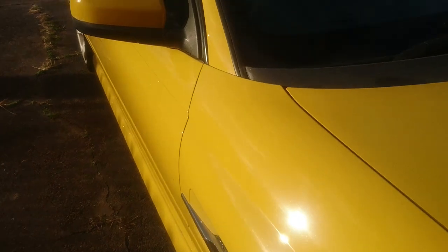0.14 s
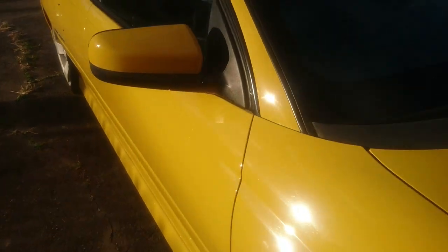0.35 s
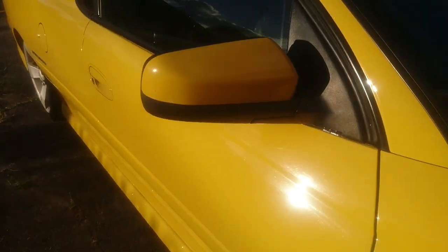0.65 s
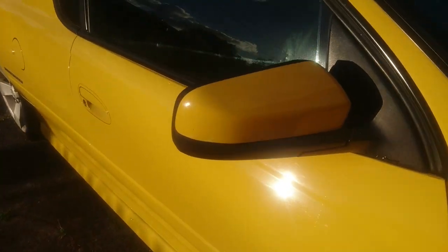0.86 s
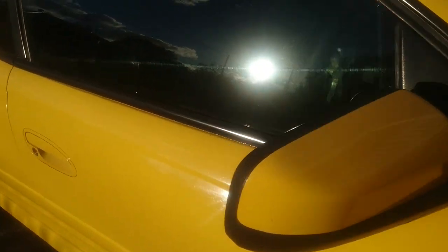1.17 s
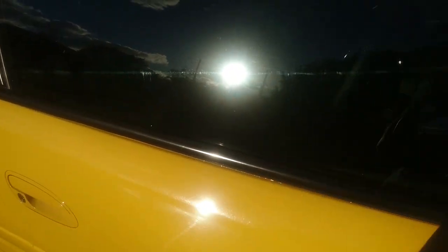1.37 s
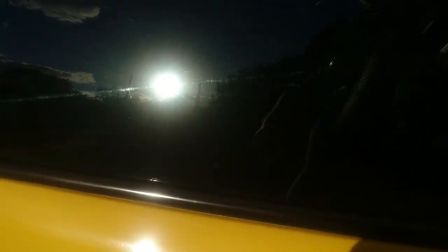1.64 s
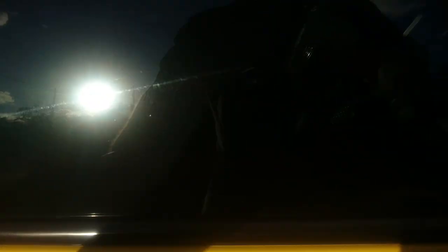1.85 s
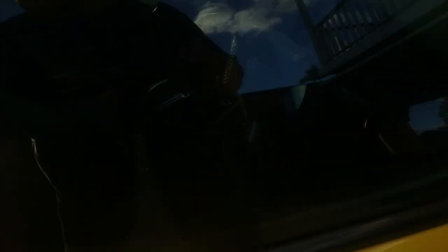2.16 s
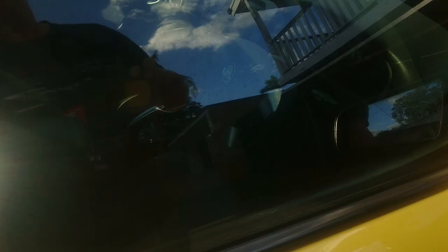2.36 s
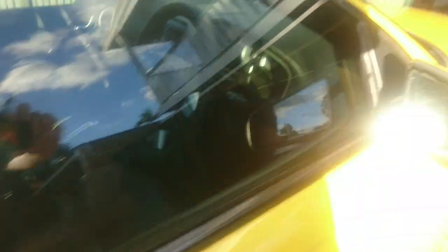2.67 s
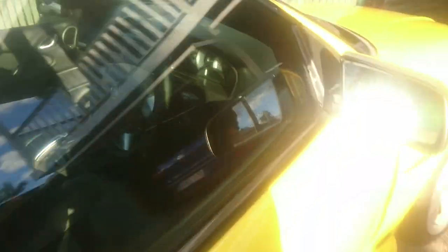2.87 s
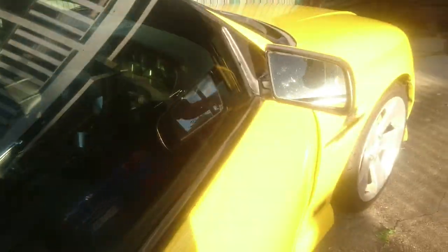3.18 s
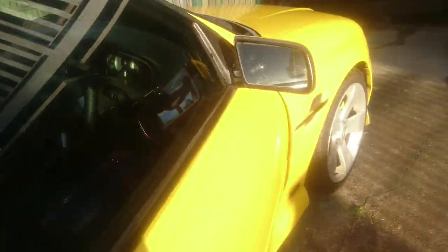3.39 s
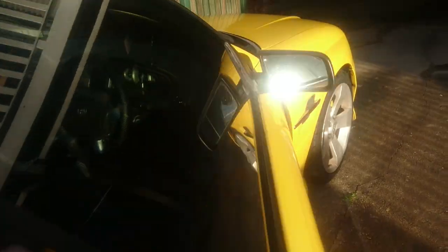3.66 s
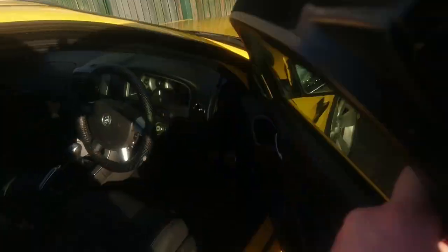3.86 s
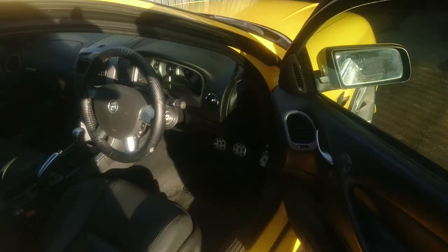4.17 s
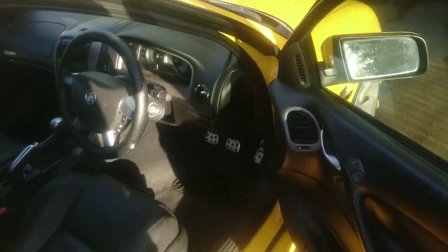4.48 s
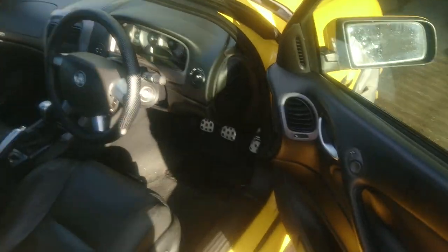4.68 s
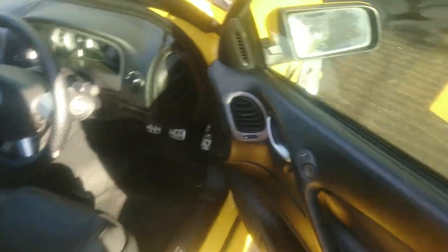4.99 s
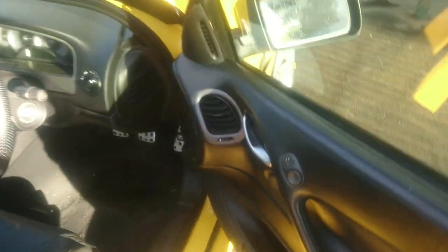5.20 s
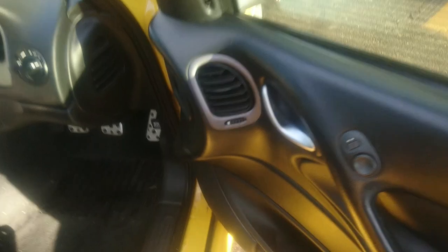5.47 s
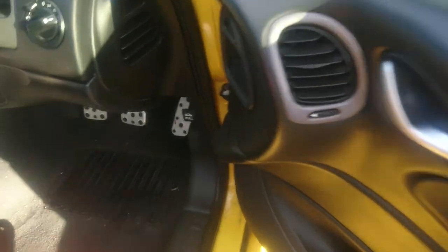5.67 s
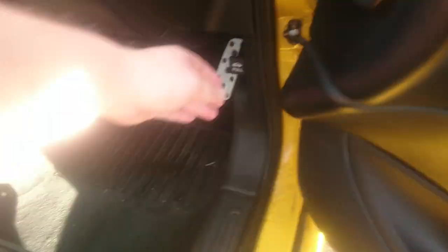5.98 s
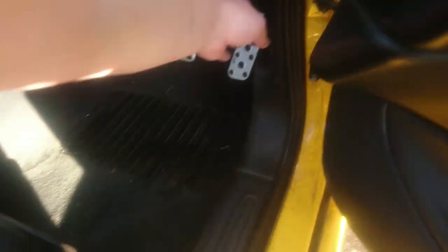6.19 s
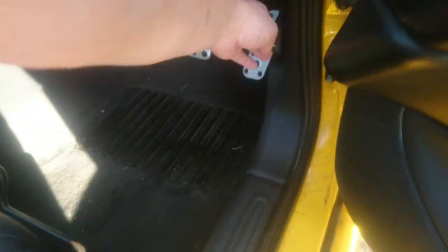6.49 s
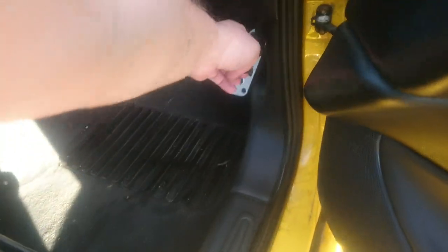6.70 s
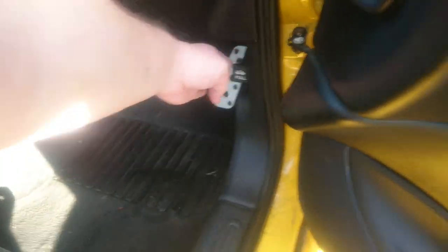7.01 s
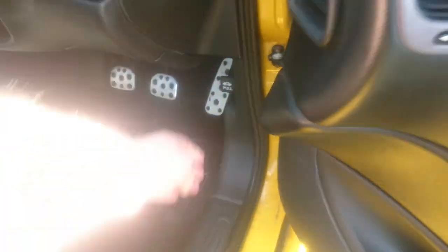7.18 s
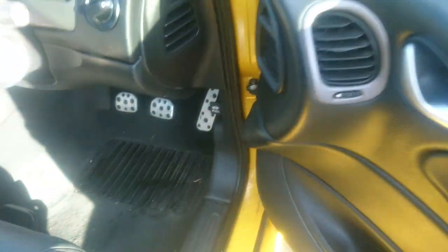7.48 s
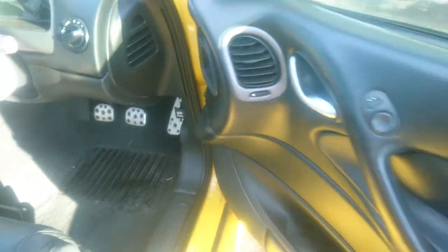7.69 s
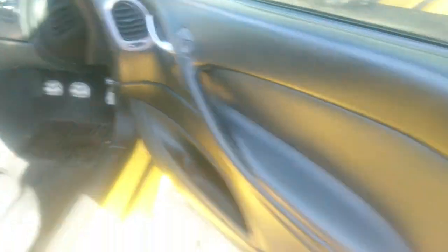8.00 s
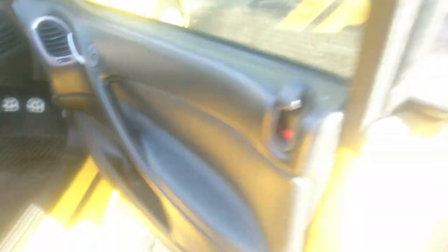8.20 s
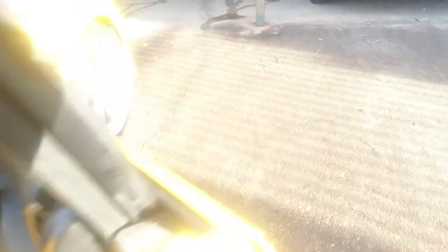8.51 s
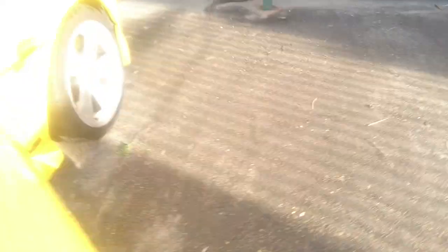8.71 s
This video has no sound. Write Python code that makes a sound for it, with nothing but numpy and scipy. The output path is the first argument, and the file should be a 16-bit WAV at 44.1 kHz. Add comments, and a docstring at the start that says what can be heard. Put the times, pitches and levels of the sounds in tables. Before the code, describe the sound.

Handle knocks and latch clicks open a car door in a quiet driveway; later a pressed pedal snaps back, booming in the footwell.

```python
"""In a quiet driveway, a car door is opened: the handle knocks on the metal panel, the latch clicks
free, and the door swings out with a soft rub. Then a hand pushes the accelerator pedal to the floor
and lets it spring back; it clacks on its stops and the footwell booms. Close by, sleeves rustle,
small things tick and feet shift, over a faint low rumble and one chirp from a far bird."""
import sys
import numpy as np
from scipy import signal
from scipy.fft import rfft, irfft, next_fast_len
from scipy.io import wavfile

SR = 44100
rng = np.random.default_rng(int(sys.argv[2]) if len(sys.argv) > 2 else 0)


def waveform_to_disk(signal):
    """Save audio, clipped to [-1, 1], as 16-bit WAV at the path in sys.argv[1]."""
    frames = np.transpose(np.atleast_2d(signal))
    scaled = np.clip(frames, -1, 1) * 32767
    samples = np.round(scaled).astype(np.int16)
    wavfile.write(sys.argv[1], SR, samples)


N = 390285
T = np.arange(N) / SR


def amp(db):
    """Turns decibels into a number to multiply by."""
    return 10 ** (np.asarray(db) / 20)


def unit(x):
    """Scales a signal to an average strength (rms) of 1."""
    return x / np.sqrt(np.mean(x ** 2) + 1e-20)


def read(points, hz):
    """Looks up a table at any frequency, blending between its rows."""
    f, value = np.transpose(points)
    return np.interp(np.log(hz + 1), np.log(f + 1), value)


def add(mix, s, sound):
    """Adds a sound to the mix, s seconds in."""
    part = mix[:, round(s * SR):][:, :sound.shape[-1]]
    part += sound[..., :part.shape[1]]


def fade(t, fade_s):
    """Dies away by 60 dB in the fade time, fade_s."""
    return np.exp(-np.log(1000) * t / fade_s)


def arch(length_s):
    """Swells from nothing and sinks back."""
    return np.sin(np.pi * np.arange(0, length_s, 1 / SR) / length_s).clip(0)


def wobble(per_s):
    """Drifts to a new random value per_s times a second."""
    targets = rng.standard_normal(N // 20)
    return unit(np.interp(T * per_s, np.arange(len(targets)), targets))


# how alike left and right sound: (frequency [Hz], likeness [0 to 1])
LIKENESS = [(50, 0.94), (200, 0.98), (500, 0.91), (1000, 0.38), (2200, 0.28), (6000, 0.11)]
def noise(count, colour):
    """Stereo noise, alike on both sides in the bass; colour(hz) gives each frequency's level in dB."""
    size = next_fast_len(count)
    hz = np.fft.rfftfreq(size, 1 / SR)
    left, other = rfft(rng.standard_normal((2, size)))
    same = read(LIKENESS, hz)
    right = same * left + np.sqrt(1 - same ** 2) * other
    return unit(irfft(np.array([left, right]) * amp(colour(hz)), size)[:, :count])


# the tone of the open air: (frequency [Hz], level [dB])
AIR_TONE = [(12, -43), (26, -32), (40, -10.5), (65, -0.5), (172, -12.5), (410, -17.5), (558, -28.5),
            (1330, -36), (2460, -40.5), (5080, -40), (5850, -34), (7950, -43.5), (16000, -46.5)]
def outdoors():
    """A faint steady hiss over a low rumble that swells a little."""
    air = amp(-50.53) * noise(N, lambda hz: read(AIR_TONE, hz))
    rumble = signal.sosfiltfilt(signal.butter(2, 400, fs=SR, output="sos"), air)  # below 400 Hz
    hiss = air - rumble
    return hiss + rumble * amp(-1.3 + 0.85 * wobble(per_s=4.1))


def slips(grain_db, clump_db):
    """Rubbing things move in clumps of tiny slips, so their loudness flickers."""
    return unit(amp(grain_db * wobble(per_s=590) + clump_db * wobble(per_s=32)))


# the tone of rubbing cloth: (frequency [Hz], level [dB])
CLOTH_TONE = [(300, 5.5), (900, 1), (1800, 0), (2700, -4), (4200, -2), (6500, 1.5), (8000, -13.5),
              (15000, -16)]
# movements of sleeve and hand: (start [s], length [s], level [dB])
SLEEVE_MOVES = [(0, 0.21, -62.5), (0.569, 0.23, -64.5), (1.116, 0.3, -59.5), (1.838, 0.31, -57),
                (2.101, 0.31, -63.5), (2.492, 0.54, -61.5), (4.947, 0.3, -60.5), (5.182, 0.41, -64),
                (5.77, 0.57, -61.5), (7.417, 0.59, -59.5), (7.975, .12, -56.5), (8.543, 0.38, -58.5)]
def sleeve_rustle():
    """Sliding cloth makes a grainy hiss that swells with each movement."""
    swells = np.zeros((1, N))
    for s, length_s, db in SLEEVE_MOVES:
        add(swells, s, amp(db) * arch(length_s) ** 0.7)
    return swells * slips(grain_db=3, clump_db=1.5) * noise(N, lambda hz: read(CLOTH_TONE, hz))


def taps(rows, narrowness, rise_ms, top_hz, top_db):
    """Short bursts of noise, each strongest near its own pitch and turned down above top_hz."""
    t, out = np.arange(SR // 3) / SR, np.zeros((2, N))
    for s, db, pitch_hz, fade_s in rows:
        colour = lambda hz: -narrowness * np.log2((hz + 1) / pitch_hz) ** 2 + top_db * (hz > top_hz)
        rise = 1 - np.exp(-1000 * t / rise_ms)
        add(out, s, amp(db) * noise(len(t), colour) * fade(t, fade_s) * rise)
    return out


# the clearest ticks: (time [s], level [dB], pitch [Hz])
CLEAR_TICKS = [(.1984, -51, 4000), (0.2077, -50, 3580), (.7068, -48.5, 4100), (1.8705, -53, 1700),
               (1.9931, -38, 3140), (2.006, -39, 3080), (2.0497, -48, 3880), (2.312, -46, 4900),
               (3.5125, -51, 3500), (3.8394, -50, 1980), (4.5527, -51.5, 4200), (5.4844, -50, 4000),
               (5.5651, -40.5, 2820), (6.0226, -45, 2280), (6.1225, -46, 3130), (6.251, -47.5, 4560),
               (6.293, -48, 5000), (7.2544, -42.5, 5100), (7.2704, -39.5, 2020), (7.3235, -48.5, 1740),
               (8.6336, -52, 1490), (8.7202, -43.5, 2800), (8.7387, -35, 2180)]
def small_ticks():
    """Grit, clothes and trim tick; three faint extra ticks fall at random in each sleeve movement."""
    strays = [(s + length_s * rng.random(), db + 1 + 2.5 * rng.standard_normal(), 3520)
              for s, length_s, db in SLEEVE_MOVES for _ in range(3)]
    fade_s = 0.039
    rows = [(*tick, fade_s) for tick in CLEAR_TICKS + strays]
    return taps(rows, narrowness=3.5, rise_ms=0.31, top_hz=7340, top_db=-9.5)


def far_bird():
    """One faint rising whistle, with a softer one an octave above."""
    swell, out = arch(length_s=0.14), np.zeros((2, N))
    pitch_hz = 2780 + 5400 * np.arange(len(swell)) / SR
    phase = 2 * np.pi * np.cumsum(pitch_hz) / SR
    whistle = np.sin(phase) + amp(-3) * np.sin(2 * phase)
    add(out, s=1.06, sound=amp(-63) * swell * whistle)
    return out


# steps and shifts of weight: (time [s], level [dB], pitch [Hz], fade time [s])
FOOT_BUMPS = [(1.885, -45.5, 520, 0.076), (4.39, -38, 101, 0.24), (5.089, -43.5, 203, 0.22),
              (5.37, -37.5, 66, 0.32), (6.3057, -40, 256, 0.07), (6.5396, -43, 296, 0.11),
              (8.7, -60, 90, 0.18)]
def footfalls():
    """Feet land softly and make dull bumps."""
    return taps(FOOT_BUMPS, narrowness=19, rise_ms=4.8, top_hz=7400, top_db=-7)


# short slides as the door opens: (start [s], length [s], level [dB], pitch [Hz])
DOOR_RUBS = [(1.963, 0.067, -48.5, 3320), (2.803, .13, -44, 1630), (2.95, .31, -56.5, 1710),
             (3.498, 0.1, -57, 1730), (3.582, 0.23, -63.5, 1820), (3.89, 0.19, -53, 1860),
             (4.049, 0.12, -52, 1680), (4.152, 0.079, -50.5, 1440), (4.208, .2, -57, 1520)]
# the strong parts of a rub's tone: (frequency [times the pitch], boost [dB], width [octaves])
RUB_BOOSTS = [(1, 9, 0.26), (2.25, 6, 0.22)]
def door_rubs():
    """Handle, latch, seal and hinge slide, each making a grainy hiss with a hint of pitch."""
    out = np.zeros((2, N))
    rise_s, fall_s = 0.034, 0.042
    for s, length_s, db, pitch_hz in DOOR_RUBS:
        def colour(hz):
            octaves = np.log2((hz + 1) / pitch_hz)
            peaks = sum(boost * np.exp(-((octaves - np.log2(k)) / width) ** 2)
                        for k, boost, width in RUB_BOOSTS)
            return read(CLOTH_TONE, hz) - 0.6 * octaves.clip(-2) + peaks
        t = np.arange(0, length_s, 1 / SR)
        swell = np.minimum(t / rise_s, 1) * np.minimum((length_s - t) / fall_s, 1)
        add(out, s, amp(db) * swell * noise(len(t), colour))
    return out * slips(grain_db=1.5, clump_db=0.35)


def thumps(blows, notes, wash_db, wash_fade_s, wash_hz):
    """A struck panel rings with a few notes over a wash of noise; longer contact sounds duller."""
    t, out = np.arange(SR) / SR, np.zeros((2, N))
    ring = sum(amp(db) * fade(t, fade_s) * np.sin(2 * np.pi * hz * t) * (-1) ** k
               for k, (hz, db, fade_s) in enumerate(notes))
    colour = lambda hz: -20 * np.log10(1 + (hz / wash_hz) ** 2 + (wash_hz / 2 / (hz + 1)) ** 2)
    for s, db, contact_ms in blows:
        age = t[:SR // 20] * 1000 / contact_ms
        push = age * np.exp(-2 * np.pi * age)
        panel = ring + amp(wash_db) * noise(SR, colour) * fade(t, wash_fade_s)
        add(out, s, amp(db) * signal.fftconvolve(panel, push[None] / push.sum(), axes=1))
    return out


# knocks on the door: (time [s], level [dB], contact time [ms])
DOOR_KNOCKS = [(2.049, -29, 5.3), (2.085, -25.5, 10), (2.165, -29.5, 6.7), (2.205, -35, 7.6),
               (2.312, -37, 2.5), (2.405, -12.5, 7.4), (2.441, -21.5, 2.9), (2.452, -23, 1.2),
               (2.913, -12.5, 1.5), (3.306, -37, 1.9), (3.461, -42, 1.6)]
# the notes the door rings with: (pitch [Hz], level [dB], fade time [s])
DOOR_NOTES = [(62, -20, 0.5), (71.7, -12, 0.14), (106.3, -14, 0.37), (128.3, -23, 1.42), (159, 0.5, 0.12),
              (182, 0.5, 0.11), (204.5, 1.5, 0.19), (235, -15.5, 0.46), (295, -21, 0.3), (375.7, -12, 0.18),
              (455, -18, 0.1), (563, -33, .25), (651, -13, 0.19)]
def door_knocks():
    """Knocks from the handle and latch set the door panel ringing."""
    return thumps(DOOR_KNOCKS, DOOR_NOTES, wash_db=-6, wash_fade_s=0.31, wash_hz=290)


def die_away(x, fades, stretch):
    """Lets the low, middle and high parts of a sound fade at their own speeds."""
    t, hz = np.arange(x.shape[1]) / SR, np.fft.rfftfreq(x.shape[1], 1 / SR)
    centres, times = np.transpose(fades)
    spectrum = rfft(x)
    bands = [irfft(spectrum * read(np.c_[centres, one], hz), len(t)) for one in np.eye(len(centres))]
    return sum(band * fade(t, fade_s * stretch) for band, fade_s in zip(bands, times))


def clacks(hits, tone, fades, notes, rise_ms, tail_db, tail_fade_s):
    """Hard parts meet: a burst of noise, clear metal notes and a faint tail from the car's body."""
    t, out = np.arange(SR * 2 // 3) / SR, np.zeros((2, N))
    rise = 1 - np.exp(-1000 * t / rise_ms)
    for s, db, brightness, stretch in hits:
        tilt = lambda hz: brightness * np.log2(np.clip(hz, 400, 6000) / 2000)
        colour = lambda hz: read(tone, hz) + tilt(hz)
        burst = die_away(noise(len(t), colour), fades, stretch)
        phases = rng.uniform(0, 2 * np.pi, (len(notes), 2, 1))
        ring = 0
        for (hz, note_db, fade_s), phase in zip(notes, phases):
            strength = amp(note_db + tilt(hz) - abs(brightness))
            ring += strength * fade(t, fade_s * stretch) * np.sin(2 * np.pi * hz * t + phase)
        tail = amp(tail_db) * np.sqrt(stretch) * noise(len(t), colour) * fade(t, tail_fade_s)
        add(out, s, amp(db) * (burst + ring + tail) * rise)
    return out


# clicks in handle and latch: (time [s], level [dB], brightness [dB per octave], fade stretch [times])
LATCH_HITS = [(2.3845, -44, 10, 0.18), (2.406, -40, 9, 0.84), (2.4114, -21.5, -1, 0.55),
              (2.433, -22.5, 10, 0.27), (2.442, -34.5, -2, 1.6), (2.5885, -43.5, -1, 0.7),
              (2.822, -40, 1, 1.5), (2.846, -38.5, 1, 0.69), (2.8649, -43, 4, 0.28), (2.9103, -21, 5, 0.41),
              (2.914, -28, -0.5, 1.23)]
# the tone of a click's noise: (frequency [Hz], level [dB])
LATCH_TONE = [(210, -27), (350, -12.5), (990, -16), (1280, -11), (1480, -19), (1910, -11.5), (2240, -11),
              (2670, -17.5), (3850, -22), (4380, -18), (4820, -25.5), (5940, -13), (7920, -33.5),
              (10400, -37), (16000, -42)]
# how that noise dies away: (frequency [Hz], base fade time [s])
LATCH_FADES = [(300, 0.19), (1000, 0.18), (2200, 0.17), (6000, 0.094), (14000, 0.11)]
# the latch's metal notes: (pitch [Hz], level [dB], base fade time [s])
LATCH_NOTES = [(1160, -22, 0.083), (1710, -10, 0.11), (1953, -3, 0.068), (2450, -25, 0.062),
               (3470, -11, 0.12), (6080, -12, 0.05), (6290, -3.5, 0.054)]
def latch_clicks():
    """Small metal parts strike each other as the latch lets go."""
    return clacks(LATCH_HITS, LATCH_TONE, LATCH_FADES, LATCH_NOTES,
                  rise_ms=0.51, tail_db=-33.5, tail_fade_s=1)


# the pedal hits its stops, plus one soft long brush just before the hardest clack: (time [s], level [dB],
# brightness [dB per octave], fade stretch [times])
PEDAL_HITS = [(6.7291, -27, 4, 1.03), (6.736, -31, -4, 3.13), (6.8643, -33.5, -4.5, 2.44),
              (7.0085, -45.5, -3.5, 5.4), (7.0479, -10.5, 0, 0.65), (7.052, -13, -1.5, 0.97)]
# the tone of a clack's noise: (frequency [Hz], level [dB])
PEDAL_TONE = [(180, -24), (300, -5.5), (433, -11), (645, -5.5), (774, -16.5), (828, -8), (1150, -1.5),
              (1300, -12.5), (1410, -8.5), (2140, -11), (2250, -19), (2930, -10.5), (5080, -14),
              (6620, -13), (8100, -29.5), (16000, -34.5)]
# how that noise dies away: (frequency [Hz], base fade time [s])
PEDAL_FADES = [(300, 0.17), (1000, 0.088), (2200, 0.12), (6000, 0.091), (14000, 0.1)]
# the pedal's metal notes: (pitch [Hz], level [dB], base fade time [s])
PEDAL_NOTES = [(1142, -7.5, 0.04), (1380, -13.5, 0.14), (1786, -13.5, 0.043), (1960, -13, 0.083),
               (2400, -15.5, 0.086), (2848, -12.5, 0.084), (3220, -13, 0.069), (4200, -19.5, 0.037),
               (6450, -15, 0.095)]
def pedal_clacks():
    """The pedal hits the floor, then springs back harder against its upper stop."""
    return clacks(PEDAL_HITS, PEDAL_TONE, PEDAL_FADES, PEDAL_NOTES,
                  rise_ms=0.8, tail_db=-32, tail_fade_s=0.43)


# knocks of the pedal and its links: (time [s], level [dB], contact time [ms])
FOOTWELL_KNOCKS = [(6.736, -15, 2.53), (6.793, -24, 2), (6.866, -30, 3.4), (7.004, -23.5, 3.5),
                   (7.049, -22.5, 2), (7.181, -25.5, 5.8), (7.375, -29.5, 6.4)]
# the notes the footwell rings with: (pitch [Hz], level [dB], fade time [s])
FOOTWELL_NOTES = [(50, -14.5, 0.51), (72.9, -7.5, .4), (85.55, -2, 0.51), (104.5, -10, .4),
                  (126.6, -11, 0.35), (159, 2.5, 0.21), (167, -7, 1), (184.2, -9, 0.89), (203, -11, .5),
                  (262, -8, 0.452), (289.6, -13, .4), (337.5, -10, 0.3), (384, -17.5, .35),
                  (414, -26.5, 0.36), (544, -14.5, 0.54)]
def footwell_boom():
    """The pedal's knocks make the panels around it boom like a drum."""
    return thumps(FOOTWELL_KNOCKS, FOOTWELL_NOTES, wash_db=-5, wash_fade_s=0.81, wash_hz=198)


def body_shudder():
    """The same knocks shake the whole car with a deep noise; long, strong pushes shake it most."""
    t, power = np.arange(SR) / SR, np.zeros((1, N))
    rise_s, pitch_hz = 0.015, 84
    swell = fade(t, fade_s=0.97) * (1 - np.exp(-t / rise_s))
    for s, db, contact_ms in FOOTWELL_KNOCKS:
        add(power, s, contact_ms * (amp(db - 18) * swell) ** 2)
    return np.sqrt(power) * noise(N, lambda hz: -7 * np.log2((hz + 1) / pitch_hz) ** 2)


def scene():
    """Adds up the quiet surroundings, the door and the pedal."""
    surroundings = outdoors() + sleeve_rustle() + small_ticks() + far_bird() + footfalls()
    door = door_rubs() + door_knocks() + latch_clicks()
    pedal = pedal_clacks() + footwell_boom() + body_shudder()
    return surroundings + door + pedal


# how much louder the left side is: (frequency [Hz], left minus right [dB])
LEFT_LOUDER = [(40, -4.5), (100, -2), (200, -6.5), (500, -2.5), (900, -2.5), (2000, -9.5), (4200, -0.5),
               (6000, -3.5), (7200, 5.5), (8500, -1), (11000, 2), (15000, -2.5)]
# how far ahead the left side's wave is: (frequency [Hz], lead [radians])
LEFT_AHEAD = [(50, 1), (220, -0.95), (500, 1.48), (1100, 0.5), (2500, 3), (6000, 4)]
def record(dry):
    """Two microphones, each with its own tone and timing, miss the deepest bass and highest treble."""
    lowest_hz, highest_hz = 29, 15900
    size = next_fast_len(N + SR // 10)
    hz = np.fft.rfftfreq(size, 1 / SR)
    left = amp(read(LEFT_LOUDER, hz) / 2) * np.exp(0.5j * read(LEFT_AHEAD, hz))
    bass_cut = 1 / np.sqrt(1 + (lowest_hz / (hz + 1)) ** 10)
    stereo = irfft(rfft(dry, size) * bass_cut * np.array([left, 1 / left]), size)[:, :N]
    treble_cut = signal.firwin(511, highest_hz, window=("kaiser", 9), fs=SR)
    return signal.oaconvolve(stereo, treble_cut[None], "same")


dry = scene()
out = record(dry)
waveform_to_disk(out)
```